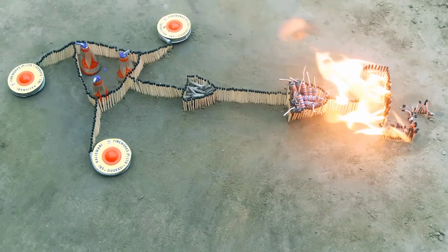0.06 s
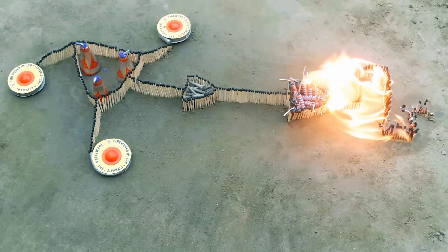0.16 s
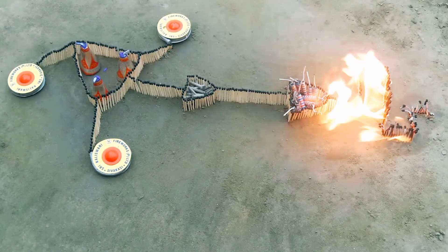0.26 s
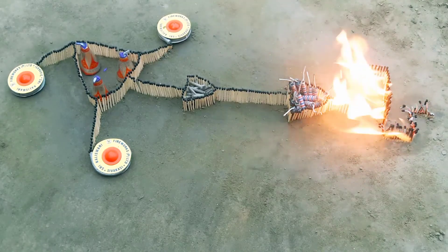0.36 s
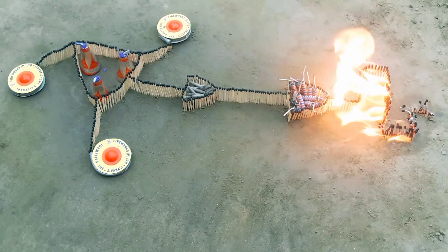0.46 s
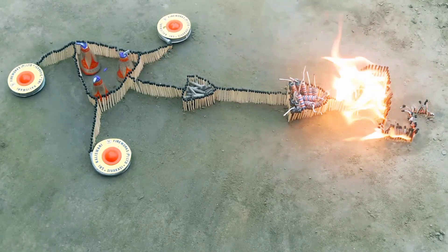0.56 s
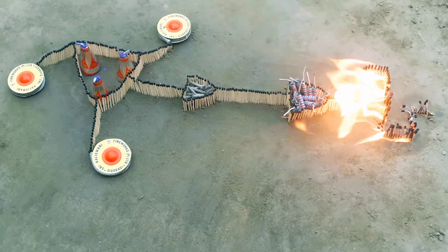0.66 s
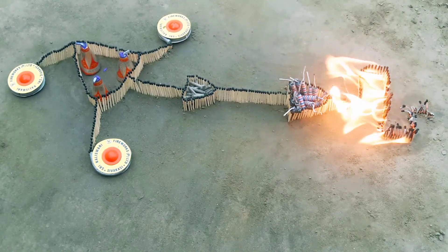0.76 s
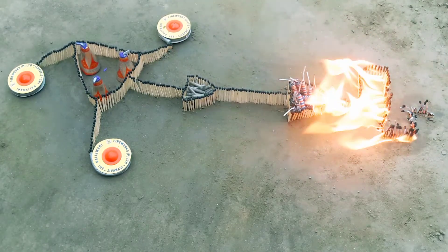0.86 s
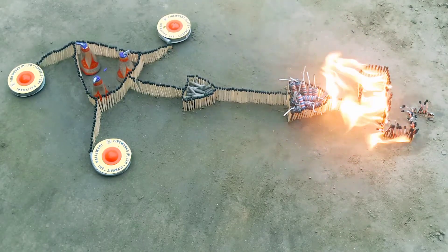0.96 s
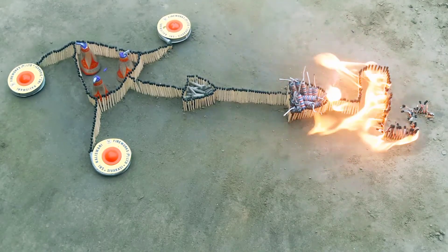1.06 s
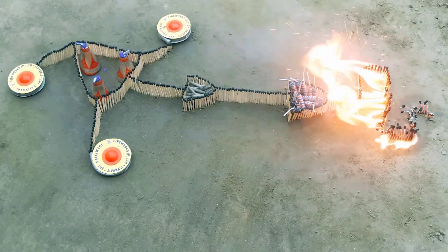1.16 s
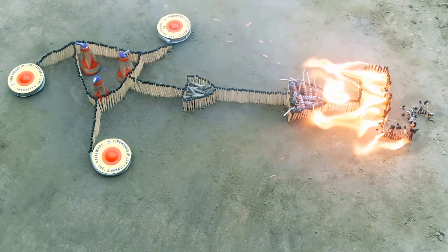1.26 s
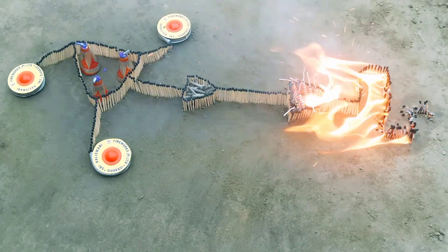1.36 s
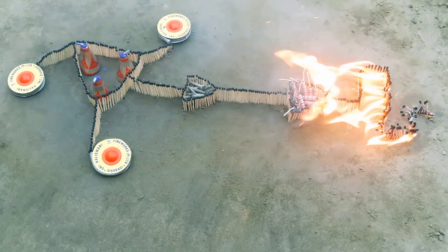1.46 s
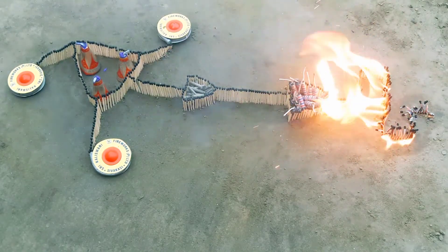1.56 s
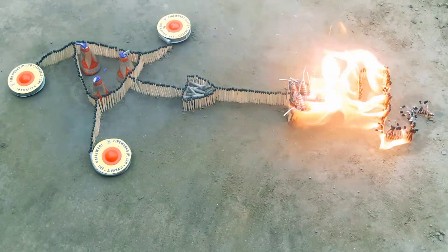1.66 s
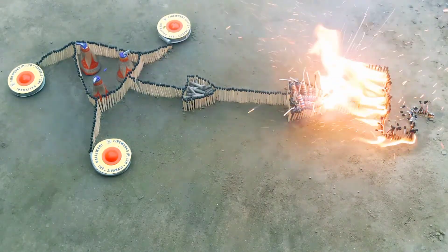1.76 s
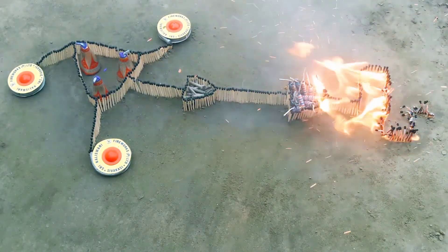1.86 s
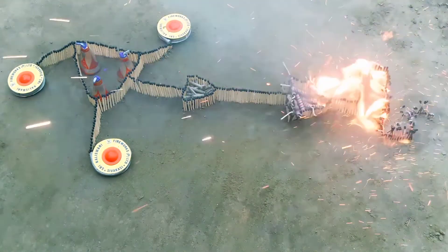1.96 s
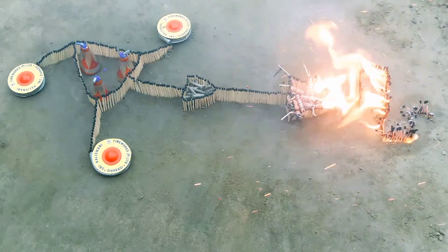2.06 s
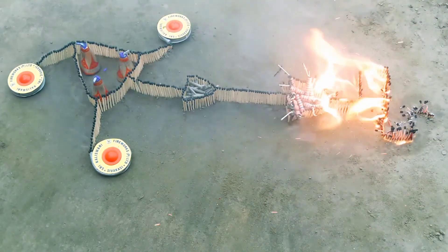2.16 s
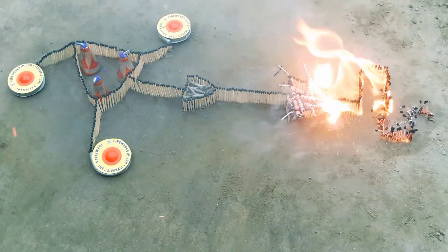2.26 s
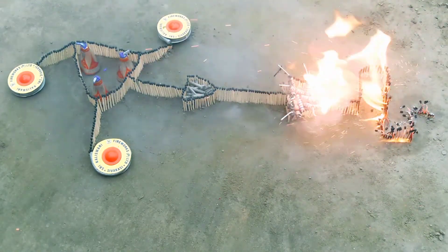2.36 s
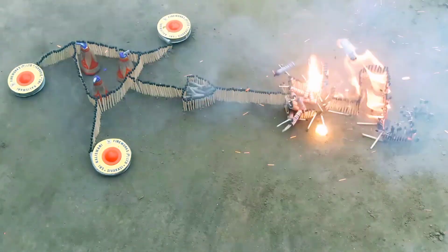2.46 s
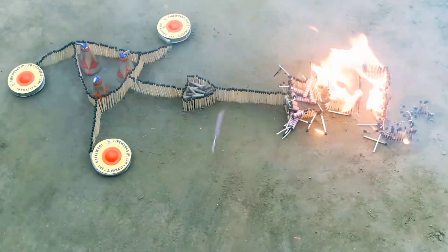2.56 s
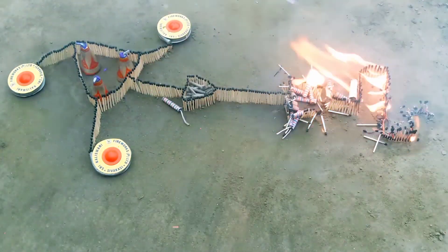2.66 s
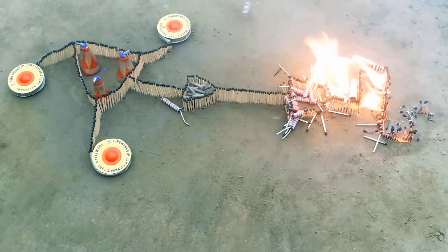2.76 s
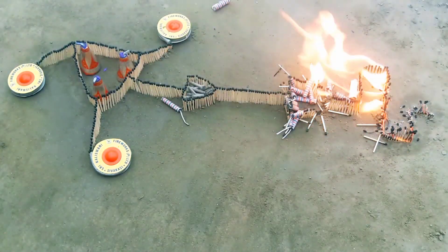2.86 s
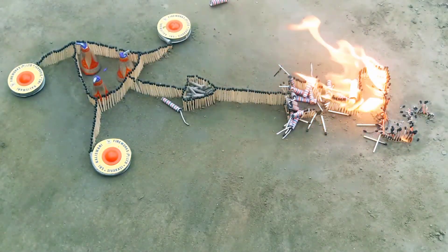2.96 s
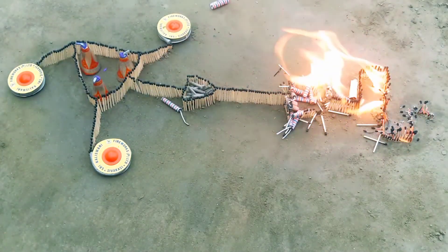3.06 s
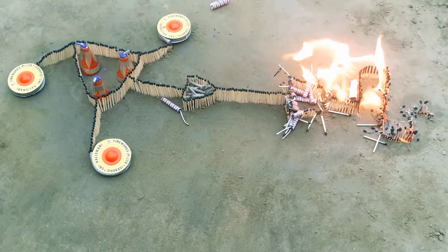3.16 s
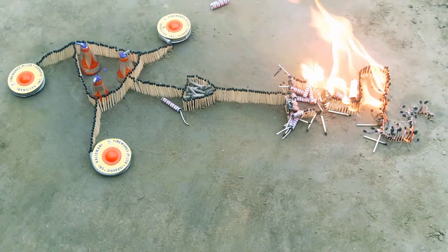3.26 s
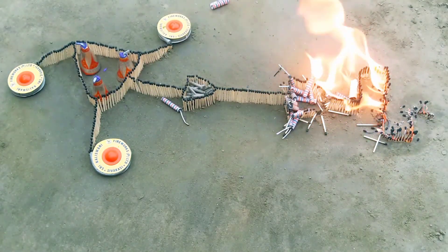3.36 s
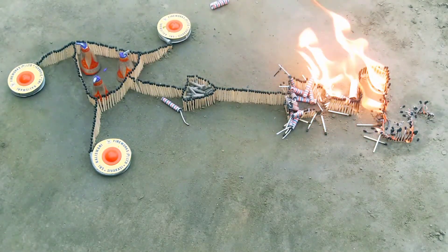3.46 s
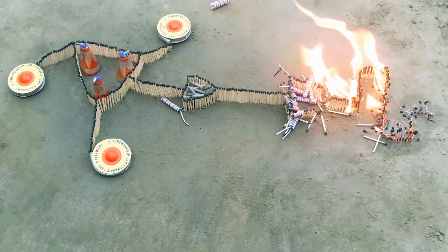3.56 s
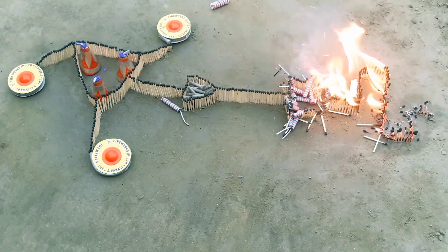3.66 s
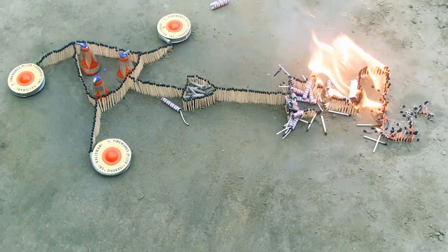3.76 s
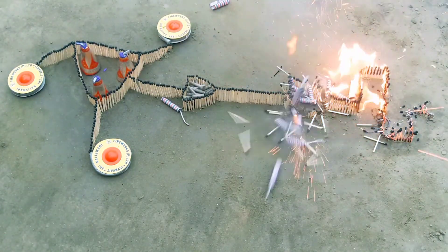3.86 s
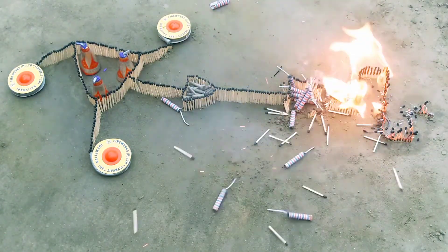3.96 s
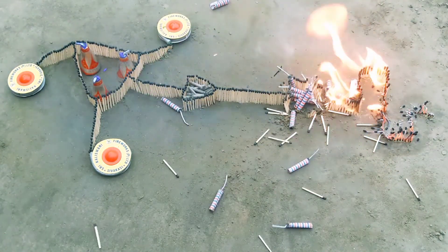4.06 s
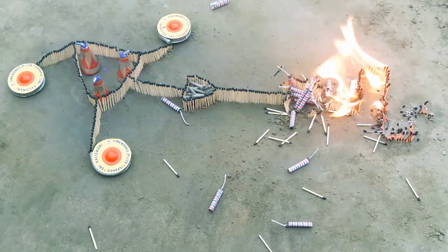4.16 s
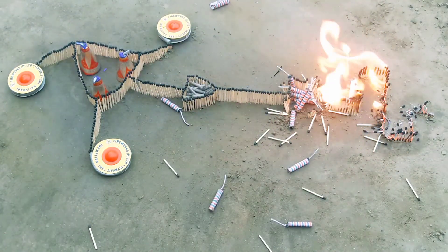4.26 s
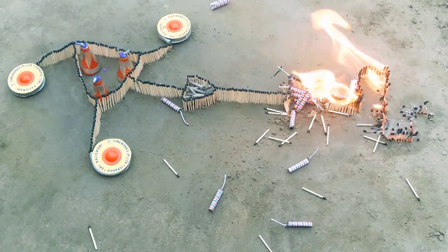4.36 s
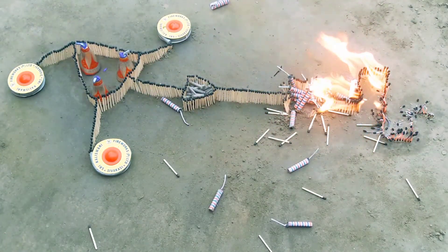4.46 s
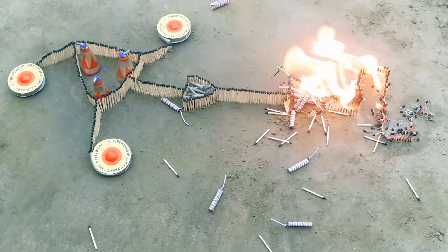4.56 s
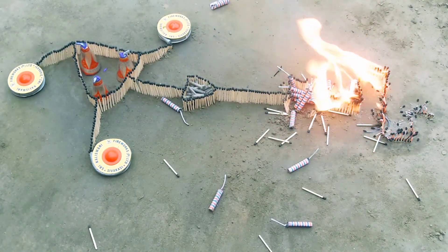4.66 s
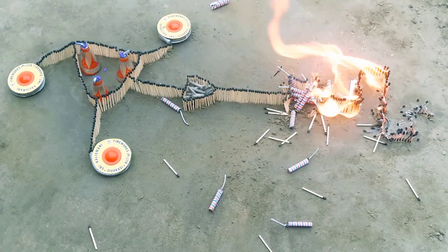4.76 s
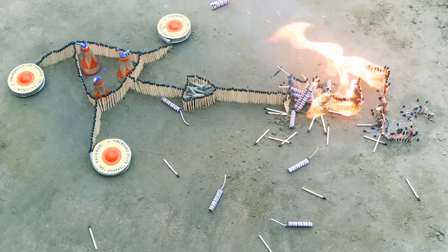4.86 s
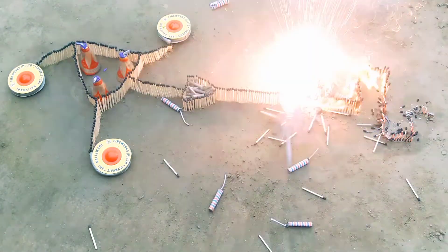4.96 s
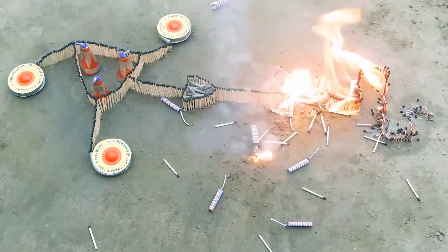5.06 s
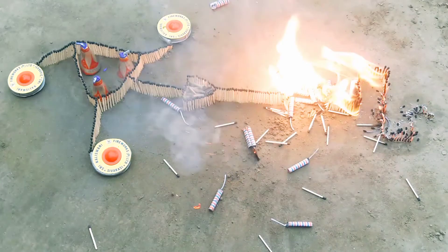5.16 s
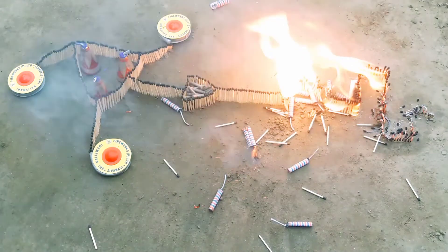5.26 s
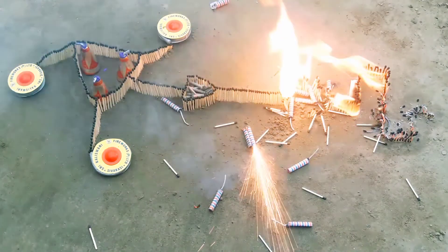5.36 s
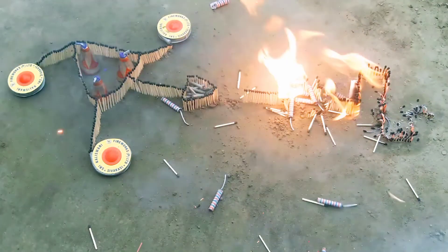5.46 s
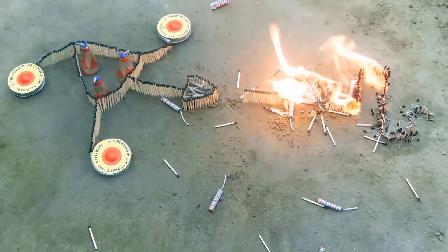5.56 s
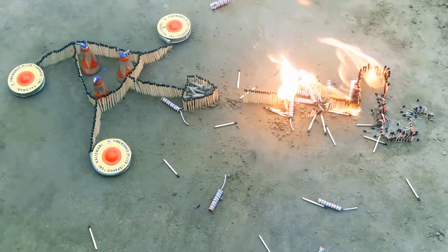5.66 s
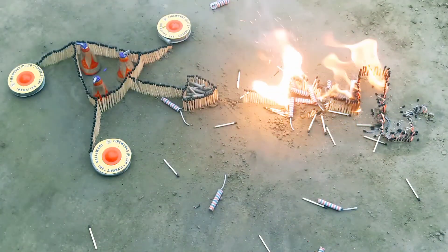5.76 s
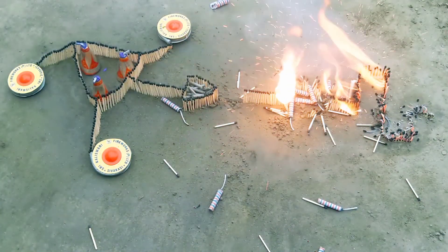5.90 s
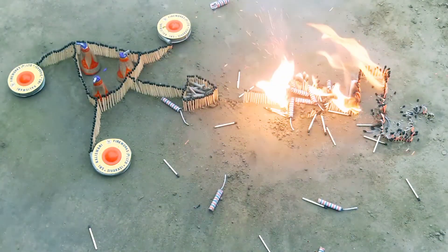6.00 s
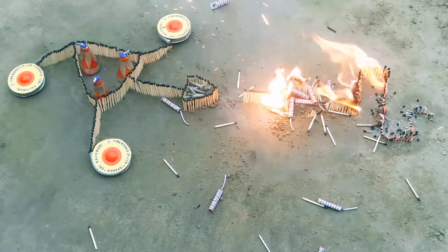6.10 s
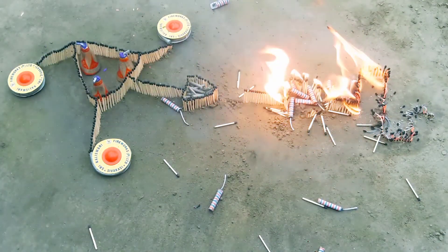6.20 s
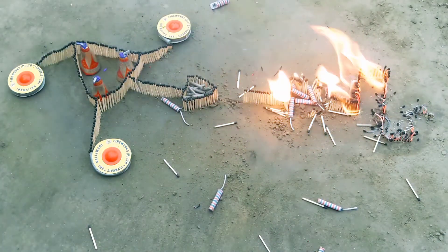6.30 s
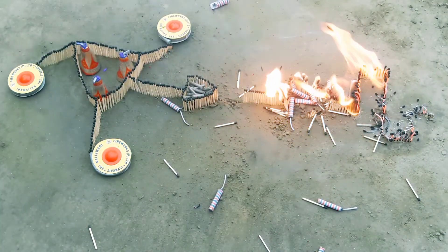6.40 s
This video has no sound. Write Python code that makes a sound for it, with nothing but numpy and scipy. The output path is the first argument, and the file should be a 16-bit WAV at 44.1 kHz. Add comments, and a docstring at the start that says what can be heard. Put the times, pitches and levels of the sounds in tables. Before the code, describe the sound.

In a walled yard, a chain of matches burns near the microphone with a low rush and a sputtering hiss. After a short, wavering fuse whistle, small firecrackers burst one by one, seven in all, two spitting and five dry and sharp, each with a quick fluttering echo. Short hissing flares come between the bangs, and faint outdoor noise lies far behind.

```python
"""Flames rush and match heads hiss close by, then a fuse whistles and seven small firecrackers go off.
A chain of matches is burning on the concrete of a walled yard, with faint outdoor noise far behind.
The first two crackers spit as they burst, the rest crack dry. Each bang flutters between the walls
and beats the flames down for a moment; the loudest overload the single nearby microphone."""
import sys
import numpy as np
from scipy import signal
from scipy.fft import rfft, irfft, next_fast_len
from scipy.io import wavfile
from scipy.ndimage import map_coordinates

SR = 44100
rng = np.random.default_rng(int(sys.argv[2]) if len(sys.argv) > 2 else 0)


def generate_wav(sig):
    """Save sig (samples, or channels by samples) to the path in sys.argv[1] as 16-bit PCM at SR."""
    pcm = np.round(np.clip(np.atleast_2d(sig).T, -1, 1) * 32767).astype(np.int16)
    wavfile.write(sys.argv[1], SR, pcm)


N = 283690

# The crackers, before the trims in cracker(): (time [s], crack [dB], boom [dB], report [dB],
# report tilt [dB/octave], spark fizz [dB], gust [dB], burn time [s])
BANGS = [(1.7814, -31.5, -28, -18.5, -1.5, -20, -66.5, 0.051),
         (2.0170, -10, -19, -12, 0.3, -15.5, -48.5, 0.065), (2.4970, -10, -22.5, -13, -3, -38, -30, .004),
         (3.9380, -4, -13, -17.5, -2.5, -20, -46.5, 0.0061),
         (5.0490, -4.5, -12.5, -14.5, -1, -28.5, -58, 0.0036),
         (5.4794, -11, -25.5, -23.5, -2.5, -31.5, -43, .004),
         (6.1548, -10.5, -16, -13, -2, -30, -62, 0.013)]
# How long the yard rings: (frequency [Hz], time to fall 60 dB [s])
YARD_DECAY = [(100, 0.21), (450, 0.23), (750, .175), (2000, 0.23), (5000, 0.26), (13000, .18)]
# The fire's grainy sizzle and its high gas hiss, each as (frequency [Hz], level [dB])
SIZZLE_SPECTRUM = [(350, -26.5), (700, -1.5), (1000, -2), (2000, -5), (2500, -9.5), (2850, -4.5),
                   (3400, -13), (3700, -10), (4600, -14), (6500, -17.5), (8000, -22.5), (11000, -42)]
HISS_SPECTRUM = [(3000, -35.5), (6500, -10), (9000, -9.5), (11000, -4), (13000, 0), (14400, -0.5),
                 (15400, -5.5), (15700, -39.5)]


def cracker(crack_db, boom_db, report_db, tilt_db, fizz_db, gust_db, burn_s):
    """Close up, the tube tears; the blast rings the walls, scatters round the yard and throws sparks."""
    # Standing waves between the walls: (frequency [Hz], level [dB])
    wall_modes = [(102, -19), (137, -7.5), (229, -0.5), (258, -4), (296, -8), (318, -2), (378, -2),
                  (409, -1), (497, 0), (570, -10), (630, -14), (688, -5), (756, -5.5)]
    # The tearing tube, its report round the yard and the sparks, each as (frequency [Hz], level [dB])
    crack_spectrum = [(120, -22), (350, -8), (850, 7), (1500, 0), (2500, -0.5), (4200, -5), (6500, -10.5),
                      (9500, -14), (14000, -9.5), (16000, -21)]
    report_spectrum = [(90, -24.5), (150, -5.5), (300, -2.5), (550, -1.5), (750, 2), (1100, -6.5),
                       (1250, -1.5), (1650, -5.5), (2200, -4), (3000, -8.5), (4400, -13), (5000, -22.5),
                       (6000, -21.5), (9000, -34.5)]
    fizz_spectrum = [(800, -27.5), (2500, -1.5), (4500, 1), (7000, -1), (9500, -3.5), (13500, 0.5),
                     (15300, -5.5), (15800, -26)]
    tear_s, round_trip_s, gust_s = 0.0048, 0.0082, 0.0053
    size = SR // 2
    t = np.arange(size) / SR
    onset = 1 - np.exp(-t / 0.00059)
    tear = amp(crack_db) * noise(crack_spectrum, size)
    spray = amp(fizz_db + 6) * noise(fizz_spectrum, size)
    crack = (tear + spray) * np.exp(-(t / tear_s) ** 4)
    ringing = np.zeros(size)
    for hz, db in wall_modes:
        decay = amp(db + rng.normal(0, 1.2) - 60 * t / along(YARD_DECAY, hz))
        ringing += decay * np.cos(2 * np.pi * hz * (t - 0.002) + rng.normal(0, 0.3))
    # the standing waves build up only as the first echoes return
    boom = amp(boom_db - 3) * ringing * (1 - np.exp(-t / 0.0021))
    # the scattered sound comes back in clumps, once for each trip between the walls
    flutter_db = 4.5 * np.cos(2 * np.pi * t / round_trip_s) * np.exp(-t / 0.047)
    clumps = amp(flutter_db + 1.8 * wobble(300)[:size])
    tilted = [(hz, db + tilt_db * np.log2(hz)) for hz, db in report_spectrum]
    report = amp(report_db) * close_echoes(noise(tilted, size), share=0.37) * clumps
    sparks = amp(fizz_db) * close_echoes(noise(fizz_spectrum, size), share=0.24)
    blast = onset * (crack + boom + yard_tail(report + sparks, burn_s))
    # so small a tube cannot radiate deep bass
    low_cut = signal.butter(2, 68.04, "highpass", fs=SR, output="sos")
    # the puff of gas pushes on the microphone, then sucks back
    gust = amp(gust_db + 10) * (1 - t / gust_s) * np.exp(-t / gust_s)
    return signal.sosfilt(low_cut, blast) + onset * gust


def crackers():
    """The crackers go off one by one as the fire reaches them."""
    out = np.zeros(N)
    for time, *blast in BANGS:
        add(out, time, cracker(*blast))
    return out


def yard_tail(x, burn_s, sag_db_per_s=126.0):
    """x sags while the powder burns, then each frequency dies as the yard lets it."""
    hz, t, spectra = signal.stft(x, SR, nperseg=256)
    sag_db = sag_db_per_s * np.minimum(t, burn_s)
    decay_db = 60 * np.maximum(t - burn_s, 0) / along(YARD_DECAY, hz)[:, None]
    return signal.istft(spectra * amp(-sag_db - decay_db), SR, nperseg=256)[1][:len(x)]


def flares():
    """Match heads and fuses catch, each a short spurt of gas that swells and dies."""
    # (peak time [s], level [dB], 60 dB rise [s], 60 dB fall [s], hiss over sizzle [dB])
    spurts = [(.23, -49.5, .044, 0.098, 3), (1.273, -40, 0.11, 0.034, -8), (1.862, -22.5, 0.024, 0.051, -2),
              (1.976, -40, 0.41, 0.086, 5.5), (3.715, -43, 0.045, 0.12, -15),
              (3.835, -44.5, 0.064, 0.14, -3.5), (3.934, -32, 0.16, 0.074, -2),
              (4.839, -48.5, 0.021, 0.081, 7), (4.89, -47, 0.024, .06, 2), (4.998, -51, 0.036, 0.14, 5.5),
              (5.479, -17, 0.037, 0.047, -1.5), (5.948, -46, 0.026, 0.24, 0), (6.126, -51, 0.34, 0.2, -13)]
    sizzle_power, hiss_power = np.zeros(N), np.zeros(N)
    for time, db, rise, fall, bright_db in spurts:
        t = clock() - time
        power = amp(db - 60 * np.maximum(-t / rise, t / fall)) ** 2
        sizzle_power += power / (1 + amp(bright_db) ** 2)
        hiss_power += power / (1 + amp(-bright_db) ** 2)
    sizzle = np.sqrt(sizzle_power) * close_echoes(noise(SIZZLE_SPECTRUM, N))
    hiss = np.sqrt(hiss_power) * close_echoes(noise(HISS_SPECTRUM, N))
    return sizzle + hiss


def fuse_whistle(waver=0.019, overtones_db=(-7, -6, -10, -27, -25)):
    """Gas squeezes out of a fuse's tube in an unsteady, climbing whistle that turns shrill midway."""
    # The whistle's course: (time [s], pitch [Hz], fundamental level [dB], overtone gain [dB])
    course = [(1.56, 892, -62, -69), (1.57, 891, -52, -66), (1.592, 857, -44.5, -54),
              (1.612, 867, -42.5, -36.5), (1.64, 965, -54, -38), (1.666, 1014, -38.5, -39.5),
              (1.678, 960, -52, -51), (1.698, 1008, -52, -49), (1.726, 1037, -34, -43.5),
              (1.74, 1025, -40.5, -74), (1.772, 1082, -42, -69)]
    pitch, db, shrill_db = curves(course)
    phase = 2 * np.pi * np.cumsum(pitch * (1 + waver * wobble(540))) / SR
    overtones = sum(amp(level + shrill_db + 2.6 * wobble(59.8)) * np.sin(k * phase)
                    for k, level in enumerate(overtones_db, 2))
    tone = np.sqrt(2) * (amp(db) * np.sin(phase) + overtones)
    sounding = (clock() > course[0][0]) & (clock() < course[-1][0])
    return sounding * amp(0.9 * wobble(80)) * tone


def flames(rush_db=-52.0, sizzle_db=-55.0, hiss_db=-79.5):
    """Turbulent flames rush; burning wood sizzles in fine grains; match heads hiss and sputter."""
    # The low rush of the flames: (frequency [Hz], level [dB])
    rush_spectrum = [(50, -25.5), (100, -13), (160, -2), (300, 1), (380, -5.5), (520, -9.5), (800, -15.5),
                     (1400, -42.5)]
    rush_drop_db, wood_drop_db = 18, 25.5  # lost while the flames lie flat
    head_hiss, head_sizzle = match_rows()
    wood = amp(-wood_drop_db * beaten_down())
    flicker = wobble(17)
    grains = rng.standard_normal(N) * amp(wobble(900))
    # after a bang the rush comes back a little sooner than the sizzle
    flattened = beaten_down(down_s=0.67, recover_s=0.057)
    rush = amp(rush_db - rush_drop_db * flattened + flicker) * noise(rush_spectrum, N)
    sizzle_gain = np.hypot(amp(sizzle_db) * wood, head_sizzle) * amp(0.8 * flicker + 0.7 * wobble(35))
    sizzle = sizzle_gain * close_echoes(coloured(grains, SIZZLE_SPECTRUM), share=0.14)
    hiss_gain = np.hypot(amp(hiss_db) * wood, head_hiss) * sputter()
    hiss_gain *= amp(1.3 * wobble(17) + 1.2 * wobble(82))
    hiss = hiss_gain * close_echoes(noise(HISS_SPECTRUM, N), share=0.13)
    return rush + sizzle + hiss


def match_rows(edge_s=0.035):
    """Hiss and sizzle gains of the match heads: each row catches, burns evenly and goes out."""
    # Rows burning through: (start [s], length [s], hiss [dB], sizzle [dB])
    rows = [(-.1, 0.88, -58, -55), (.76, 0.34, -65.5, -59.5), (1.144, 0.9, -56, -49),
            (2.107, 0.62, -77, -63.5), (3.26, 0.29, -72, -58), (5.059, 0.18, -64, -60),
            (5.228, 1, -69.5, -65), (6.21, .3, -77, -66)]
    t, hiss, sizzle = clock(), np.zeros(N), np.zeros(N)
    for start, length, hiss_db, sizzle_db in rows:
        alight = (np.tanh((t - start) / edge_s) - np.tanh((t - start - length) / edge_s)) / 2
        hiss += amp(hiss_db) * alight
        sizzle += amp(sizzle_db) * alight
    return hiss, sizzle


def sputter(rate=5.5, jump=0.46, life_s=0.017, count=120):
    """A gain that jumps and falls back as single match heads catch, rate times a second at random."""
    gaps, sizes = rng.exponential(1, (count, 2)).T
    starts = np.round(np.cumsum(gaps) / rate * SR).astype(int)
    heard = starts < N
    kicks = np.bincount(starts[heard], jump * np.minimum(sizes[heard], 2), N)
    return 1 + signal.lfilter([1], [1, -np.exp(-1 / (life_s * SR))], kicks)


def beaten_down(down_s=0.73, recover_s=0.06, full_blast_db=-12.5):
    """How flat the blasts lay the flames, 0 (upright) to 1; they lie for down_s, then stand up again."""
    down = np.zeros(N)
    for time, crack_db, *_ in BANGS:
        age = clock() - time
        force = min(amp(crack_db - full_blast_db), 1)
        lying = (age > 0) * (1 - np.tanh((age - down_s) / (2 * recover_s))) / 2
        down = np.maximum(down, force * lying)
    return down


def thin_tones(relative_width=0.019, drop_db=12.5):
    """Faint, narrow, fuzzy tones come and go behind the fire, weaker just after a bang."""
    # One swell for each tone: (start [s], length [s], pitch [Hz], level [dB])
    tones = [(.7, .7, 7330, -65), (1.58, .25, 5470, -59), (1.7, .3, 6350, -57), (2.05, .3, 5300, -58),
             (2.35, 1.2, 5380, -73), (2.85, .9, 6290, -68), (4.66, .45, 7500, -67), (5.55, .65, 7370, -63),
             (3.37, .17, 1345, -54), (3.48, .16, 3680, -60), (4.64, .15, 1520, -63), (3.33, .22, 312, -52),
             (3.66, .23, 245, -53), (3.72, .11, 720, -55)]
    out = np.zeros(N)
    for start, length, pitch, db in tones:
        swell = np.sin(np.pi * np.clip((clock() - start) / length, 0, 1))
        white = rng.standard_normal(N)
        tone = filtered(white, lambda hz: 1 / (1 + ((hz / pitch - 1) / relative_width) ** 2))
        out += amp(db) * swell * unit(tone)
    return out * amp(1.6 * wobble(8.5) - drop_db * beaten_down())


def close_echoes(x, share=0.25, count=8, ground_s=0.0011, ground_gain=0.3):
    """x combed by its bounce off the concrete and by weak echoes from things close by, at rms 1."""
    delays_s = rng.uniform(0.0018, 0.014, count)
    echoes = np.zeros(SR // 20)
    echoes[0], echoes[round(ground_s * SR)] = 1, ground_gain
    echoes[np.round(delays_s * SR).astype(int)] = share * rng.choice([-1, 1], count)
    return unit(signal.fftconvolve(x, echoes)[:len(x)])


def distant_air(level_db=-67.5):
    """Faint, wavering outdoor noise from far off."""
    # The distant noise: (frequency [Hz], level [dB])
    air_spectrum = [(70, -13), (280, 3.5), (700, -5), (1500, -7), (3000, -14.5), (6000, -35), (14000, -38)]
    return amp(level_db + 1.9 * wobble(6)) * noise(air_spectrum, N)


def amp(db):
    """Decibels as a gain."""
    return 10 ** (np.asarray(db) / 20)


def unit(x):
    """x at rms 1."""
    return x / np.sqrt(np.mean(x ** 2) + 1e-20)


def along(points, hz):
    """(frequency [Hz], value) points read on a log axis."""
    frequencies, values = np.transpose(points)
    return np.interp(np.log(hz + 1), np.log(frequencies + 1), values)


def clock():
    """The time of every sample."""
    return np.arange(N) / SR


def curves(rows):
    """One value per sample for each column after the time."""
    times, *columns = np.transpose(rows)
    return [np.interp(clock(), times, column) for column in columns]


def wobble(rate):
    """A smooth random curve, rate knots a second."""
    return map_coordinates(rng.standard_normal(int(N * rate / SR) + 4), [clock() * rate])


def filtered(x, response):
    """x times a response of frequency."""
    size = next_fast_len(len(x) + 8192)
    return irfft(rfft(x, size) * response(np.fft.rfftfreq(size, 1 / SR)), size)[:len(x)]


def coloured(x, spectrum):
    """x with the given spectrum, falling away below its first point, at rms 1."""
    lowest_hz = spectrum[0][0]
    return unit(filtered(x, lambda hz: amp(along(spectrum, hz)) * np.minimum(hz / lowest_hz, 1) ** 2))


def noise(spectrum, size):
    """Coloured noise of rms 1."""
    return coloured(rng.standard_normal(size), spectrum)


def add(track, start_s, sound):
    """Mix a sound into the track."""
    part = track[round(start_s * SR):][:len(sound)]
    part += sound[:len(part)]


def scene():
    """The yard in mono: bangs over the fire; the level dips briefly just before the second one."""
    lull = amp(-13 * np.exp(-((clock() - 2.015) / 0.011) ** 2))
    fire = (flames() + flares()) * lull + fuse_whistle()
    background = thin_tones() + distant_air()
    return (crackers() + fire + background)[None]


def record(dry, ceiling=1.0, top_hz=15900):
    """The nearby microphone rounds off the highest peaks and keeps nothing above its band limit."""
    rounded = dry[0] / (1 + np.abs(dry[0] / ceiling) ** 4) ** (1 / 4)
    return filtered(rounded, lambda hz: 1 / (1 + (hz / top_hz) ** 140))[None]


dry = scene()
out = record(dry)
generate_wav(out)
```